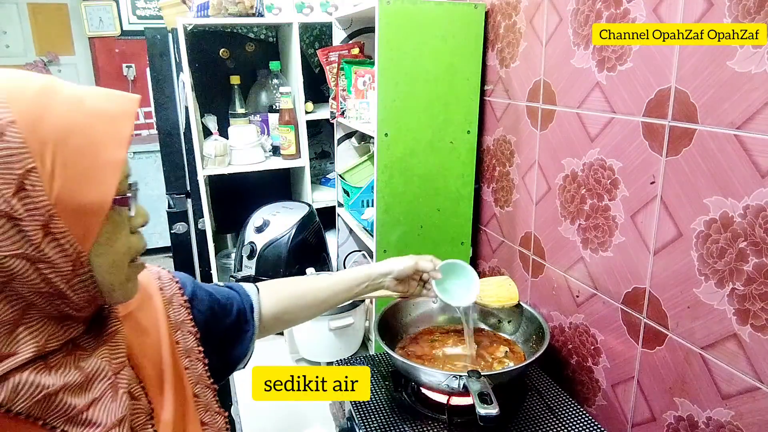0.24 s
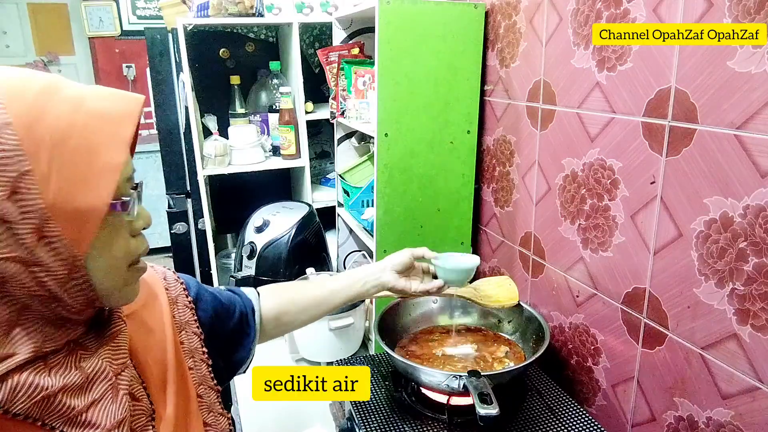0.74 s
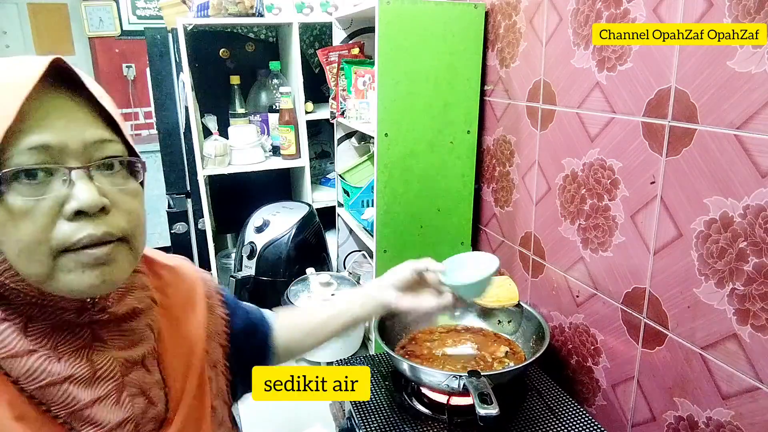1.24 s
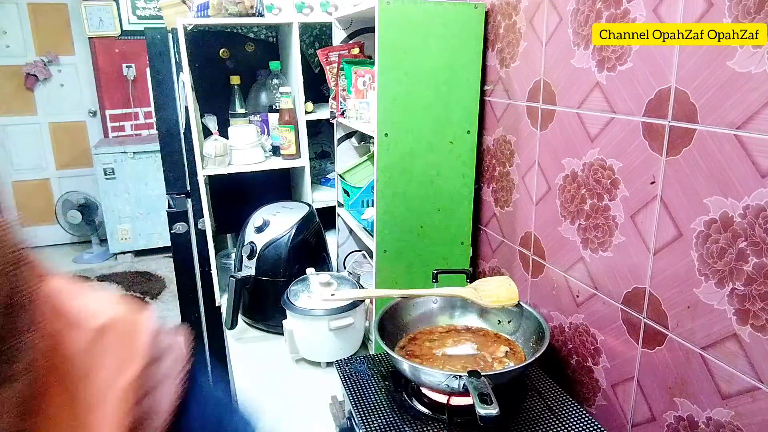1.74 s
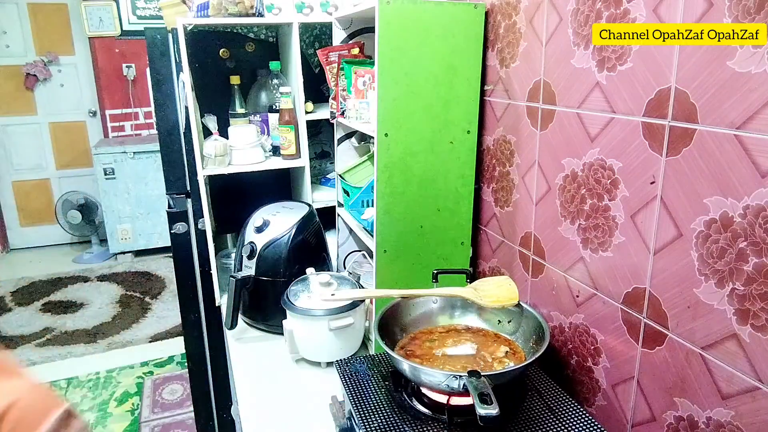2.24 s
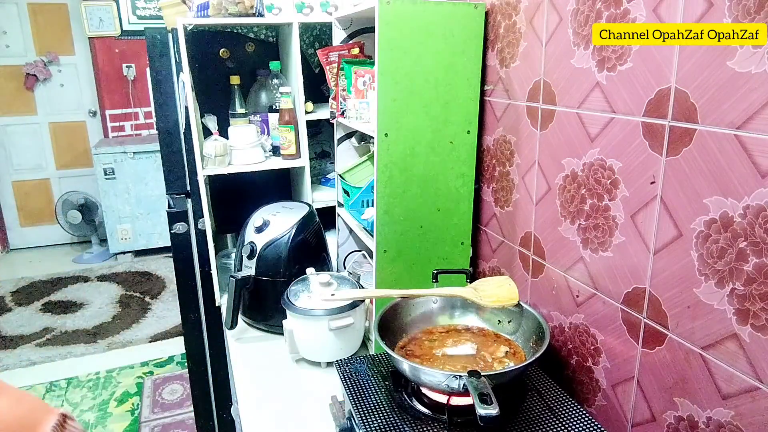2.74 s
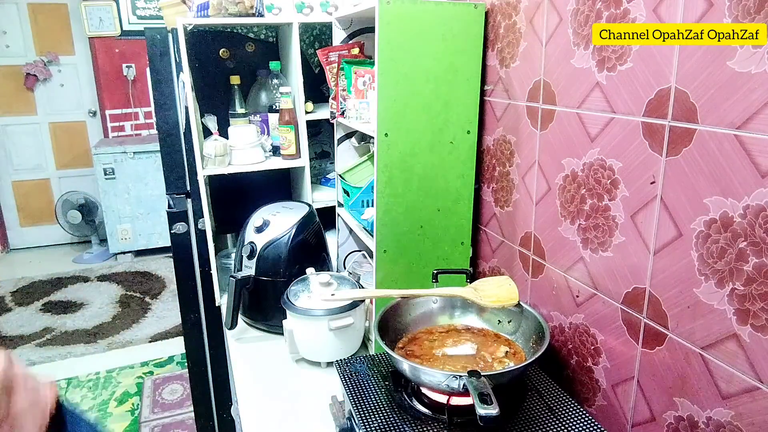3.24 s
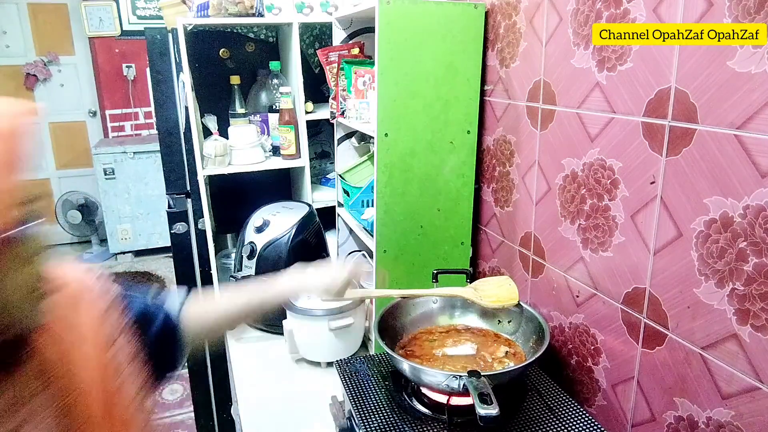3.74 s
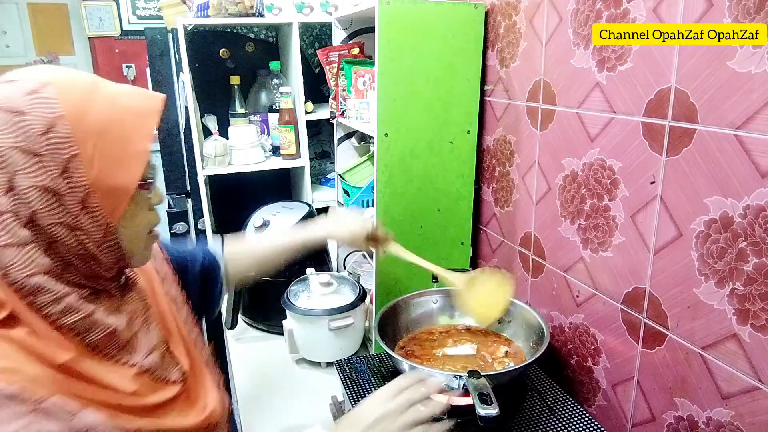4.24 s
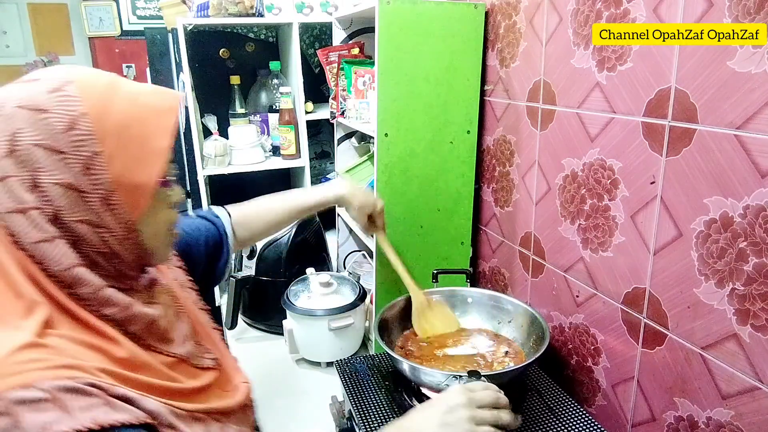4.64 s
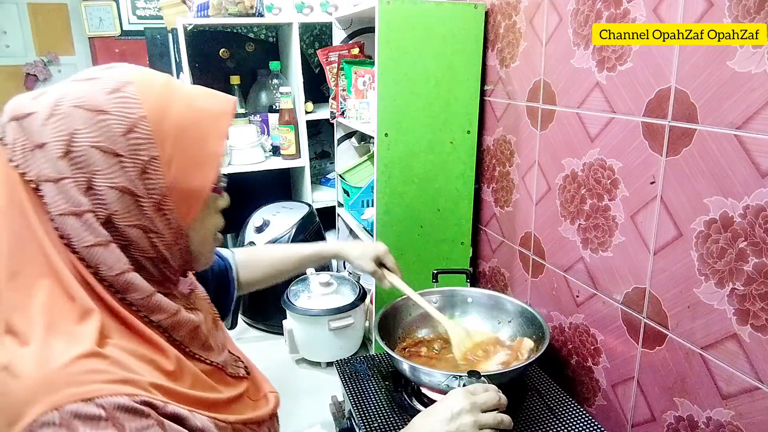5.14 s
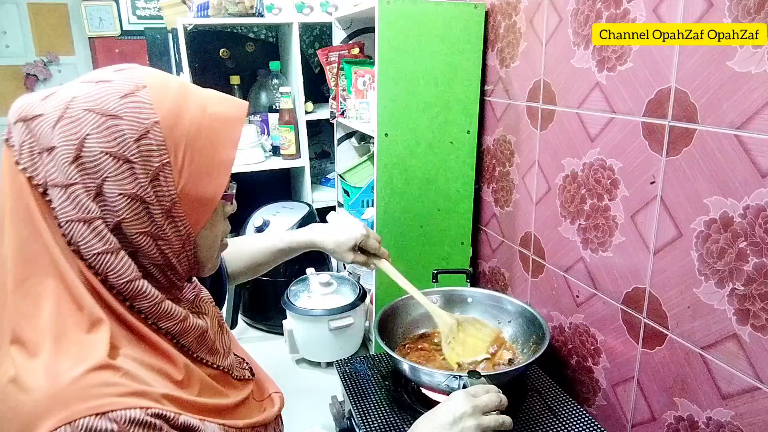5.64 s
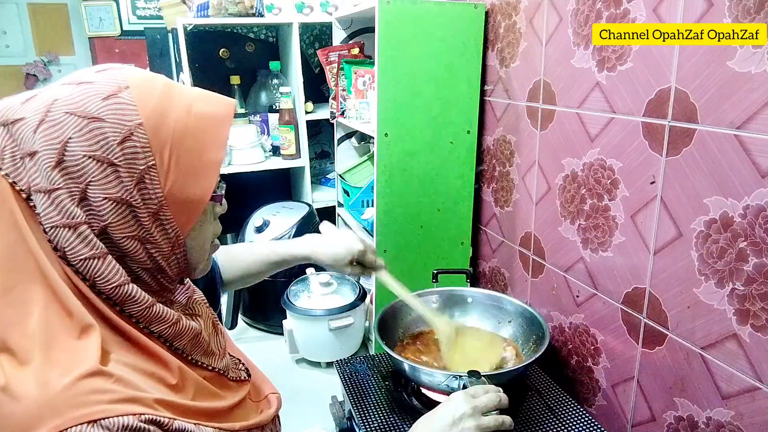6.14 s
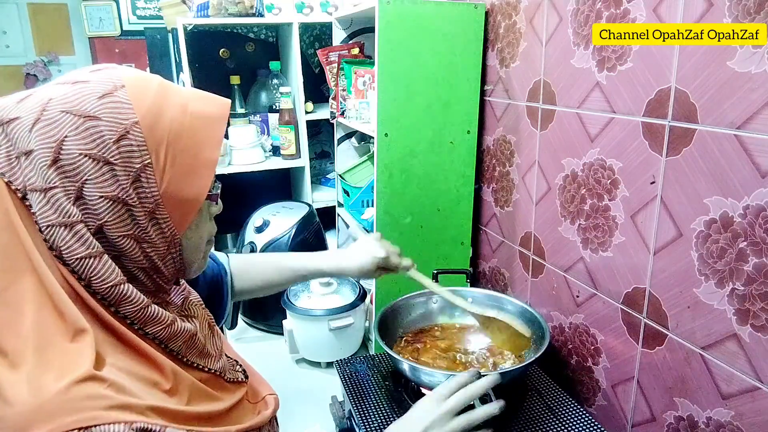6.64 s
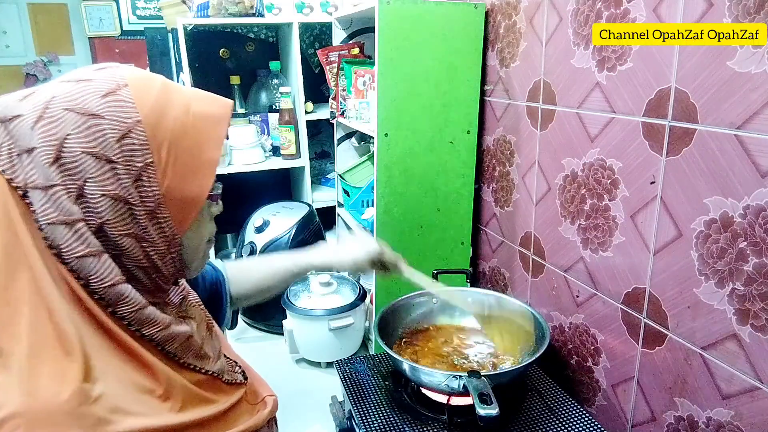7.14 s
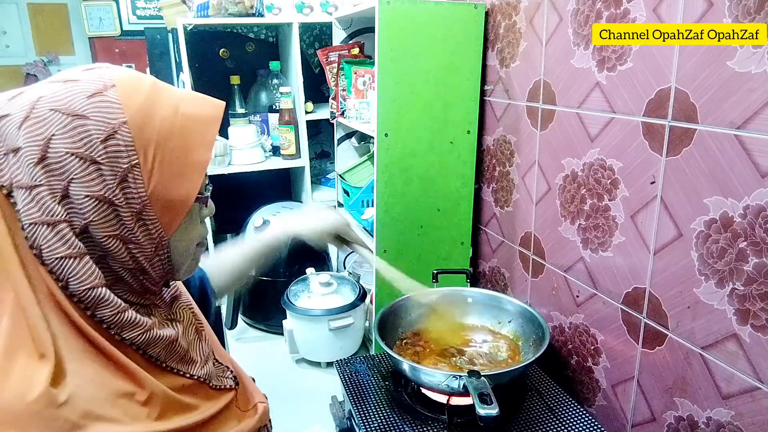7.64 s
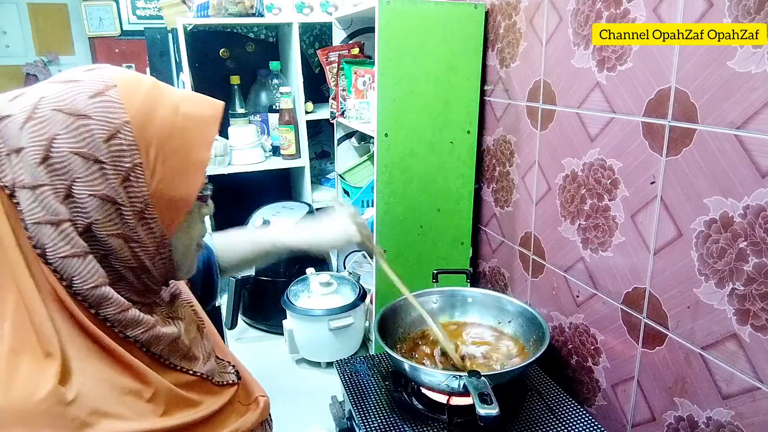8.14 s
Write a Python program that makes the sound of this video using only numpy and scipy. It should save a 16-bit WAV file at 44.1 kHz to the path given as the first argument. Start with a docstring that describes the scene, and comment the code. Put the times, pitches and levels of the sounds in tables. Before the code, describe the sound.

Gravy simmers in a steel wok on a home stove, heard close on a phone in a small tiled kitchen. From 0 to 2.8 s there is lively sizzling, round bubbling and irregular bright spits with a thin metallic ring, over faint burner hum and soft low bumps. At 2.9 s a bowl lands with a sharp rattling clack, thud and steam flare. Sparser spits follow, with a tiny dropout near 3.55 s. Around 4.5-5 s a spatula scrapes in rough, falling metallic rasps, with a sizzle swell at 4.6 s. From 5 to 6.4 s the simmer sinks to small drop fizzes and isolated ticks. At 6.6 s hot sizzle jumps up, strongest near 7.1 s with hard cracks, again at 7.7 s, with popping bubbles between. Another flare comes at 8.3 s; after 8.37 s only a dull murmur remains. Quiet hiss gates in and out throughout.

```python
"""A steel wok of gravy simmers on a home stove, a phone close by as microphone in a small tiled kitchen.
From the start noise bursts sizzle, bubble and spit through the wok's resonances over a low burner hum.
A bowl lands at 2.9 s as rattled modes; the sound drops out briefly at 3.5 s; from 4.5 s a spatula scrapes
as stick-slip rings, drops fizz and the simmer sinks. Strokes that bare hot steel swell it at 4.6 s and
from 6.6 s on; after 8.37 s a dull murmur is left. The phone's suppressor shuts quiet bands throughout."""
import sys
import numpy as np
from scipy import signal
from scipy.fft import rfft, irfft
from scipy.io import wavfile
from scipy.ndimage import uniform_filter1d

SR = 44100
rng = np.random.default_rng(int(sys.argv[2]) if len(sys.argv) > 2 else 0)


def unload_wav(signal):
    """Save mono or channel-first audio to the path in sys.argv[1] as 16-bit WAV at rate SR, clipped to [-1, 1]."""
    wavfile.write(
        sys.argv[1],
        SR,
        np.round(np.clip(np.atleast_2d(signal).T, -1, 1) * 32767).astype(np.int16),
    )


N = 370440
CLOCK_S = np.arange(0, N / SR, .001)  # slow levels are worked out once a millisecond

# spectrum of the sizzle, also used for the burner: (frequency [Hz], relative density [dB per Hz])
SIZZLE_SPECTRUM = [(590, -42.5), (1000, 0), (1320, 0.5), (1590, -1.5), (1750, -0.5), (2500, -3),
                   (2740, -10.5), (3120, -7), (5190, -10), (8260, -5.5), (10800, -12), (14900, -5.5),
                   (16000, 3.5)]


def undb(db):
    """Amplitude ratio of a level in dB."""
    return 10 ** (np.asarray(db) / 20)


def unit(x):
    """Scales a sound to an RMS of 1."""
    return x / np.sqrt(np.mean(x ** 2))


def band(x, hz, width):
    """Two-pole band-pass, gain 1 at the centre; width in Hz."""
    hz = min(hz, .42 * SR)
    return signal.lfilter(*signal.iirpeak(hz, hz / width, fs=SR), x)


def walk(rate):
    """Random levels held 1 / rate s and slewed; spread near 1."""
    k = int(SR / rate)
    held = np.repeat(rng.standard_normal(N // k + 1), k)
    return uniform_filter1d(held, k // 2)[:N]


def add(out, s, x):
    """Lays a short sound into the scene at s seconds."""
    i = int(s * SR)
    out[i:i + len(x)] += x[:N - i]


def late(x, s):
    """The same sound arriving s seconds later."""
    k = int(round(s * SR))
    return np.concatenate([np.zeros(k), x[:-k]])


def fade(t60, length_s=.5):
    """Exponential decay by 60 dB in t60 seconds."""
    return np.exp(-np.log(1000) * np.arange(int(length_s * SR)) / SR / t60)


def colour(x, spectrum, lo_hz, hi_hz):
    """Shapes a source by a spectrum between two soft edges."""
    hz, db = np.transpose(spectrum)
    f = np.arange(1, N // 2 + 2) * SR / N
    edges = 1 / np.sqrt((1 + (lo_hz / f) ** 10) * (1 + (f / hi_hz) ** 10))
    shape = undb(np.interp(np.log(f), np.log(hz), db)) * edges
    return irfft(rfft(x) * shape, N)


def swell(s, hold_s, rise_db_s, fall_db_s):
    """Power of a rise, a hold and a fall, straight in dB, 1 at the top."""
    t = CLOCK_S - s
    down_db = rise_db_s * np.maximum(-t, 0) + fall_db_s * np.maximum(t - hold_s, 0)
    return undb(-2 * down_db)


def gain(power):
    """Turns power on the millisecond clock into amplitude at every sample."""
    return np.interp(np.arange(N) / SR, CLOCK_S, np.sqrt(power))


def wok(x, ring_db):
    """The thin steel rings along with whatever happens in it."""
    # resonances of the steel: (frequency [Hz], width [Hz], level before ring_db [dB])
    steel_modes = [(498.7, 24, -5.5), (724, 31, -10), (1071, 140, -6.5), (1491, 80, -1), (1620, 55, 0),
                   (1840, 36, -4.5), (2047, 38, -0.5), (2521, 66, -2), (3104, 80, -11.5), (3836, 210, -8),
                   (4614, 29, -6), (5680, 60, -26), (6910, 530, -19), (8220, 940, -17.5),
                   (9300, 340, -12.5), (9850, 150, -29.5), (10200, 34, -18.5), (11350, 210, -24.5),
                   (12200, 240, -23.5), (14800, 530, -15.5)]
    ring = sum(undb(db) * band(x, f, w) for f, w, db in steel_modes)
    return x + undb(ring_db) * ring


def crackle(rate, scatter_db, tail_s):
    """Random bursts at rate per second, few of them large, each dying in a short noisy tail."""
    over_db = np.minimum(scatter_db * rng.exponential(size=N), 9)
    sizes = (rng.random(N) < rate / SR) * undb(over_db)
    tails = signal.lfilter([1], [1, -np.exp(-1 / (tail_s * SR))], sizes)
    return unit(tails * rng.standard_normal(N))


def pops(rate, scatter_db, tail_s):
    """Fat pops of many sizes; each sounds only in its own band."""
    centres_hz = 1500 * 2 ** np.arange(0, 3.5, .4)
    return unit(sum(band(crackle(rate, scatter_db, tail_s), hz, 0.35 * hz) for hz in centres_hz))


def patchy_hiss(spread_db, rate):
    """Hiss whose narrow bands come and go on their own."""
    out = np.zeros(N)
    for hz in 900 * 2 ** np.arange(0, 4.3, .2):
        narrow = unit(band(rng.standard_normal(N), hz, .15 * hz))
        out += np.sqrt(hz) * undb(spread_db * walk(rate)) * narrow
    return unit(out)


def pan_levels():
    """The simmer, with every stroke and flare added to it in power; large bubbles come singly."""
    # the simmer: (time [s], sizzle [dB], body of the sizzle [dB], small bubbles [dB], large bubbles [dB])
    simmer = [(0.0, -45.5, -49.5, -47, -56), (0.199, -46.5, -49.5, -47.5, -49.5),
              (0.534, -46, -50.5, -48.5, -56.5), (0.555, -44, -48, -44, -50.5),
              (1.101, -40.5, -46, -48.5, -56.5), (1.24, -45, -49, -49, -59), (1.26, -39, -48, -44, -55),
              (1.7, -45, -49.5, -47.5, -56.5), (2.17, -47, -51.5, -47.5, -57.5),
              (2.5, -44, -50.5, -48.5, -58.5), (2.85, -49.5, -51, -48.5, -71),
              (3.099, -48.5, -49, -46.5, -56.5), (3.359, -45.5, -51.5, -47.5, -57.5),
              (3.819, -47, -59.5, -48.5, -58.5), (3.97, -48.5, -55.5, -49.5, -61),
              (4.45, -52.5, -48.5, -48, -55.5), (5.05, -57, -53.5, -46.5, -58), (5.3, -55.5, -72, -50, -67),
              (5.5, -56.5, -63, -51, -66), (5.599, -62, -54.5, -48, -78), (5.78, -87, -78.5, -67.5, -78),
              (6.15, -84, -78, -56.5, -60.5), (6.42, -80.5, -55.5, -53.5, -61),
              (6.56, -34.5, -36.5, -48.5, -64.5), (6.9, -53, -46.5, -48.5, -64.5),
              (7.3, -42.5, -44, -53.5, -64), (7.459, -41, -53.5, -61, -71), (7.52, -51, -44, -51.5, -69),
              (8.0, -47, -54, -52.5, -80), (8.4, -38.5, -38.5, -45.5, -77)]
    # strokes that bare hot steel: (time [s], hold [s], sizzle [dB], body [dB], small bubbles [dB],
    # rise [dB/s], fall [dB/s])
    strokes = [(4.637, 0.11, -31, -38, -70, 163.5, 83.5), (6.609, 0.086, -31, -46, -50, 169, 35.5),
               (7.13, 0.063, -25, -34, -43, 87, 111.5), (7.695, 0.02, -28, -37, -45, 84.5, 51)]
    # sudden flares of steam: (time [s], sizzle [dB], body [dB], small bubbles [dB])
    flares = [(1.083, -36.5, -53, -54), (1.866, -33.5, -37.5, -38.5), (2.463, -46, -44, -42),
              (2.902, -29, -32, -34.5), (3.109, -47, -44.5, -65), (3.467, -45, -39.5, -50.5),
              (4.118, -45.5, -44, -60), (4.21, -50, -56, -58), (4.278, -40.5, -42, -66),
              (4.45, -37.5, -52, -56), (5.649, -43.5, -61.5, -63), (5.818, -49, -56.5, -68),
              (5.855, -49, -51, -75.5), (5.986, -78, -46, -37.5), (6.189, -42.5, -74, -85),
              (8.299, -30, -37, -49)]
    # single large bubbles: (time [s], level [dB])
    glugs = [(0.0, -49), (0.17, -46), (0.56, -60), (0.79, -50.5), (1.26, -54), (1.85, -59.5), (2.53, -54.5),
             (2.66, -52.5), (2.92, -43), (3.04, -55), (4.21, -57), (4.33, -49), (4.49, -51), (4.65, -60),
             (4.77, -54), (5.8, -59), (5.99, -49), (6.359, -57), (6.62, -65.5), (6.83, -73.5), (6.95, -56),
             (7.159, -55.5), (7.7, -61), (7.979, -55), (8.09, -59.5), (8.378, -52.5)]
    s, *columns = np.transpose(simmer)
    power = np.array([undb(2 * np.interp(CLOCK_S, s, db)) for db in columns])
    for s, hold_s, *db, rise, fall in strokes:
        power[:3] += undb(db)[:, None] ** 2 * swell(s, hold_s, rise, fall)
    for s, *db in flares:
        power[:3] += undb(db)[:, None] ** 2 * swell(s, 0, rise_db_s=2493.5, fall_db_s=265.5)
    for s, db in glugs:
        power[-1] += undb(db) ** 2 * swell(s, 0, rise_db_s=496, fall_db_s=85)
    return np.array([gain(p) for p in power])


def pan():
    """Tiny steam bursts over hiss; slower, rounder bubbles below."""
    # spectrum of the bubbles: (frequency [Hz], relative density [dB per Hz])
    bubble_spectrum = [(120, -32.5), (200, 4), (241, -11.5), (284, 2), (406, -8.5), (490, 0), (1060, -10.5),
                       (1310, -11.5), (1400, -1.5), (1820, -33.5), (3080, -120)]
    seam_hz = 3000  # body of the sizzle below, treble above
    levels = pan_levels()
    heat_db = np.clip(20 * np.log10(levels[0]) + 35.0, -15, 5)
    drowned_db = 0.444 * heat_db  # loud sizzle drowns the ring of the steel

    # the louder the sizzle, the smaller the share of crackle in it
    shares = [undb(-0.28 * heat_db) * undb(1.0), undb(0.6), undb(-4.5)]
    parts = [crackle(300, 4.2, 0.00026), pops(40, 3.7, 0.013), patchy_hiss(spread_db=2.5, rate=9)]
    fizz = sum(g * x for g, x in zip(shares, parts)) / np.sqrt(sum(g ** 2 for g in shares))
    treble = unit(wok(colour(fizz, SIZZLE_SPECTRUM, seam_hz, 22000), 8.0 - drowned_db))
    body = unit(wok(colour(fizz, SIZZLE_SPECTRUM, 1060, seam_hz), 2.0 - drowned_db))

    blubs = crackle(200, 0.99, 0.009) + undb(3.5) * rng.standard_normal(N)
    small = unit(wok(colour(blubs, bubble_spectrum, 693, 1250), 15) * undb(1.6 * walk(30)))
    large = unit(colour(blubs, bubble_spectrum, 355, 355)) * undb(2.0 * walk(11))
    return np.sum(levels * [treble, body, small, large], axis=0)


def rumble():
    """Burner and worktop hum in three loose low bands, swelling with each bump."""
    # low bumps carried by floor and worktop: (time [s], hold [s], level [dB])
    low_bumps = [(0.08, 0.026, -45.5), (0.264, 0.042, -54), (0.492, 0.015, -62.5), (0.74, 0.082, -52),
                 (1.128, 0.039, -47.5), (1.498, 0.14, -57), (1.887, 0.014, -60.5), (2.31, .01, -57),
                 (2.51, 0.036, -48.5), (2.932, 0.0087, -45), (3.052, 0.14, -53), (3.556, 0.0077, -57.5),
                 (4.51, 0.023, -47.5), (4.7, 0.2, -51.5), (6.014, 0.043, -60), (6.747, 0.04, -52.5),
                 (7.705, 0.029, -60)]
    floor_db = -71
    hum = np.zeros(N)
    for hz, width, db in [(74, 20, -5.0), (123.2, 22, 4.5), (188.0, 18, 8)]:
        hum += undb(db) * band(rng.standard_normal(N), hz, width)
    hum = band(hum, 175, 120) * undb(2.0 * walk(13))
    bumps = sum(undb(db) ** 2 * swell(s, hold_s, rise_db_s=391, fall_db_s=102.5)
                for s, hold_s, db in low_bumps)
    return gain(undb(floor_db) ** 2 + bumps) * unit(hum)


def burner_hiss():
    """The burner: steady noise, coloured like the sizzle."""
    return undb(-57.5) * unit(colour(rng.standard_normal(N), SIZZLE_SPECTRUM, 300, 20000))


def still_air():
    """The still air of the kitchen: one broad, very faint low band of noise."""
    return undb(-74.5) * unit(band(rng.standard_normal(N), 98, 230))


def spits():
    """A click, then a burst of steam, bright around one pitch, with a lower body."""
    # spits and taps: (time [s], level before the final trim [dB], brightest frequency [Hz],
    # relative level of the body [dB], decay t60 [s])
    spit_events = [(0.0, -41, 3700, -5.5, 0.098), (0.124, -24, 3700, -21.5, 0.06),
                   (0.171, -23.5, 3910, -24, 0.042), (0.217, -31.5, 3500, -12.5, 0.066),
                   (0.2612, -27, 3180, -24, 0.05), (0.2821, -23, 3800, -9, 0.027),
                   (0.4796, -26.5, 7600, -19, 0.14), (0.5477, -19.5, 7540, -9, 0.091),
                   (0.5601, -23.5, 3900, 0, 0.014), (0.596, -15.5, 3860, -34.5, 0.036),
                   (0.6747, -26, 4030, -3.5, 0.1), (0.851, -24, 14240, -12, 0.035),
                   (0.924, -28.5, 9740, -31.5, 0.11), (0.9747, -27, 8050, -22, 0.13),
                   (1.056, -12, 7190, -19, 0.045), (1.2355, -20, 4520, -14, 0.078),
                   (1.2532, -15, 8200, -35, 0.064), (1.272, -17, 8400, -10, 0.08),
                   (1.3201, -20, 7800, -11, 0.15), (1.394, -20, 8240, -56, 0.031),
                   (1.422, -26.5, 7100, -14, 0.037), (1.4523, -19, 15100, -9.5, 0.042),
                   (1.4911, -24.5, 8300, -17, 0.12), (1.646, -23, 8200, -17, 0.05),
                   (1.681, -24, 8800, -25, 0.11), (1.724, -26, 9500, -7, 0.16),
                   (1.7649, -27.5, 8800, -3, 0.039), (1.8419, -22, 3900, -21, 0.1),
                   (1.8675, -16, 8100, -10, 0.049), (2.0022, -24.5, 14100, -14.5, 0.056),
                   (2.035, -26.5, 14800, -12, 0.26), (2.0826, -16, 9530, -22, 0.022),
                   (2.1345, -25, 9000, -11, 0.14), (2.1781, -26, 6800, -5.5, 0.15),
                   (2.2987, -26, 7020, -10.5, 0.19), (2.383, -26.5, 15040, -47, 0.052),
                   (2.439, -30, 9200, -21, 0.074), (2.5364, -16, 9060, -23.5, 0.025),
                   (2.617, -19, 5720, -29.5, 0.098), (2.699, -12.5, 8460, -38.5, 0.057),
                   (2.7576, -19.5, 8040, -27.5, 0.075), (2.7779, -16, 14800, -19, 0.096),
                   (2.8252, -18, 8180, -18, 0.13), (2.8574, -25.5, 8630, -3.5, 0.033),
                   (2.9023, -7, 13630, -37.5, 0.093), (3.026, -21.5, 8530, -4, 0.037),
                   (3.0609, -21.5, 7940, -7, 0.049), (3.1001, -12.5, 6530, -18, 0.1),
                   (3.4618, -27, 9500, -4.5, 0.14), (3.5601, -33, 14800, 1, 0.14),
                   (3.6026, -20.5, 14800, -12.5, 0.077), (3.703, -30, 9500, -5.5, 0.089),
                   (3.7551, -25, 14800, -10.5, 0.038), (3.8125, -31.5, 2750, 0, 0.072),
                   (3.929, -28.5, 8030, -3.5, 0.068), (3.9587, -23.5, 12500, -32, 0.046),
                   (4.1184, -16, 7540, -14.5, 0.058), (4.1907, -17.5, 3600, -18, 0.074),
                   (4.233, -28, 3680, 0, 0.04), (4.2654, -17.5, 8200, -6.5, 0.032),
                   (4.317, -26.5, 8700, -32, 0.042), (4.386, -33, 14100, -11, 0.051),
                   (4.4419, -11.5, 5300, -10, 0.042), (4.477, -12.5, 3100, -11.5, 0.077),
                   (4.5252, -22.5, 3940, -8, 0.15), (4.595, -27, 3930, 0, 0.1),
                   (4.6103, -22, 4050, -28, 0.071), (4.7299, -11, 3170, -6, 0.044),
                   (5.074, -34, 14460, -5.5, 0.041), (5.5786, -31.5, 7920, -10, 0.052),
                   (5.6481, -30.5, 7940, 1, 0.074), (5.8155, -22, 3200, -17, 0.024),
                   (5.8559, -21, 8470, -19, 0.026), (5.9873, -43.5, 2810, -7.5, 0.086),
                   (6.1874, -18, 4400, -20, 0.025), (6.189, -24.5, 11400, -36, 0.096),
                   (6.1945, -23, 4490, -27, 0.062), (6.279, -27, 9020, -34, 0.04),
                   (6.355, -36, 3200, -1.5, 0.12), (6.4732, -23, 8850, -8, 0.066),
                   (6.5156, -24.5, 3070, -18, 0.19), (6.542, -19, 11200, -25, 0.046),
                   (6.595, -18, 8300, -34, 0.12), (6.7013, -20, 8000, -5.5, 0.06),
                   (6.7373, -28, 8460, -1, 0.1), (6.808, -21, 3130, -6.5, 0.073),
                   (6.9079, -22.5, 3160, -7.5, 0.53), (6.9621, -13.5, 8050, -9, 0.026),
                   (7.01, -29.5, 8400, 6.5, 0.18), (7.36, -25.5, 8750, -15, 0.1),
                   (7.403, -21.5, 7600, -12, 0.083), (7.439, -21.5, 14800, -45, 0.049),
                   (7.6104, -18, 8300, -15, 0.067), (7.676, -17.5, 8300, -8.5, 0.13),
                   (7.857, -24, 7700, -12.5, 0.1), (7.9897, -16, 8050, -12, 0.044),
                   (8.1611, -29.5, 8150, -15, 0.055), (8.229, -23, 9000, -26, 0.092),
                   (8.2771, -16, 7900, -9.5, 0.023), (8.2897, -13.5, 7150, -22.5, 0.14)]
    wall_echo_s, wall_echo_db = .00044, -2.5  # a spit comes back off the near wall of the wok
    out = np.zeros(N)
    for s, db, hz, body_db, t60 in spit_events:
        shape = fade(t60, length_s=.3) + undb(7.5) * fade(0.0017, length_s=.3)
        burst = rng.standard_normal((2, len(shape))) * shape
        bright = band(band(burst[0], hz, 0.22 * hz), hz, 0.96 * hz)
        bright = bright + undb(-18.5) * np.diff(burst[0], prepend=0)
        # the echo is moved to whole cycles, so it arrives in step with the brightest pitch
        cycles = max(round(wall_echo_s * hz), 1)
        bright = bright + undb(wall_echo_db) * late(bright, cycles / hz)
        body = undb(body_db + 8) * band(burst[1], 1300, 2100)
        add(out, s, undb(db - 3) * (bright + body))
    return undb(-12.5) * wok(out, 14.0)


def bursts():
    """Bubbles burst at the surface: short noise around one pitch, coloured by the steel."""
    # bursting bubbles: (time [s], peak level [dB], brightest frequency [Hz])
    burst_events = [(0.124, -36.5, 1520), (0.279, -34, 705), (0.474, -33, 1490), (0.745, -28, 730),
                    (0.859, -35.5, 950), (1.11, -32, 1470), (1.129, -42, 1050), (1.349, -33, 705),
                    (1.901, -39, 1450), (2.036, -37, 2060), (2.084, -39.5, 1580), (2.115, -34, 1620),
                    (2.328, -41, 1500), (2.371, -42, 1540), (2.461, -27.5, 1640), (2.536, -33, 1990),
                    (2.617, -42.5, 2540), (2.649, -45, 728), (3.26, -41.5, 716), (3.398, -33.5, 2080),
                    (3.673, -33.5, 2050), (3.983, -42.5, 2530), (6.447, -32, 1610), (6.614, -26.5, 2450),
                    (6.659, -37, 1630), (6.934, -24.5, 1620), (7.06, -29, 1600), (7.092, -21.5, 1500),
                    (7.501, -38, 2000), (7.569, -26.5, 1530), (7.632, -30, 1630), (7.66, -24.5, 1520),
                    (7.693, -28, 1680), (7.734, -20.5, 1630), (7.788, -30, 1620), (7.817, -23, 2560),
                    (7.922, -38.5, 1540), (8.101, -31, 1380), (8.158, -39, 2520)]
    out = np.zeros(N)
    for s, db, hz in burst_events:
        noise = fade(.04, length_s=.3) * rng.standard_normal(int(.3 * SR))
        burst = wok(band(noise, hz, 0.36 * hz), 3.8)
        add(out, s, undb(db) * burst / np.abs(burst).max())
    return out


def cracks():
    """Spitting fat: one steep pressure step each, with a few milliseconds of bright spray."""
    # sharp single cracks: (time [s], level before the wok rings along [dB])
    crack_events = [(0.5483, -20.5), (0.8595, -31.5), (0.944, -30), (0.9756, -23.5), (1.7776, -25.5),
                    (1.9457, -30.5), (2.0831, -27), (2.376, -26), (2.4386, -24), (2.4771, -25.5),
                    (2.5364, -27.5), (2.8241, -20), (3.1013, -26), (3.174, -31), (3.5026, -22),
                    (3.9601, -34.5), (4.1828, -26), (4.3166, -26.1), (4.7996, -19), (4.9837, -26.5),
                    (5.6513, -30.5), (5.819, -31.5), (6.473, -34), (6.518, -25), (6.5419, -18),
                    (6.5962, -18.5), (6.9088, -22), (7.125, -7), (7.1848, -11.5), (7.351, -27),
                    (7.3605, -26.5), (7.449, -27), (7.5473, -32.5), (7.8593, -20.5), (8.1924, -26.5),
                    (8.198, -30)]
    out = np.zeros(N)
    for s, db in crack_events:
        noise = rng.standard_normal(int(.03 * SR))
        spray = undb(-14) * fade(0.018, length_s=.03) * np.diff(noise, prepend=0)
        spray[:4] = [1, .2, -.8, -.4]  # sums to nothing, so the step has little bass
        add(out, s, undb(db) * spray)
    return wok(out, -1.5)


def bowl():
    """The bowl lands; a short rattling contact shakes its modes."""
    # the landing: (time [s], level before the ring and rattle shares [dB])
    landing = [(2.899, -11.5)]
    # modes of the bowl: (frequency [Hz], relative level [dB], t60 that sets the mode width [s])
    bowl_modes = [(1200, 7, 0.44), (1610, 7.5, 0.16), (4300, 4, 0.22), (6570, 8.5, 0.088), (7540, 1, 0.11),
                  (7600, -2, 0.29), (8300, -8, 0.24), (9500, -2.5, 0.13), (10840, -10, 0.14),
                  (12000, -2, 0.16), (13100, 0, 0.11)]
    out = np.zeros(N)
    (s, db), = landing
    t = np.arange(int(.5 * SR)) / SR
    attack = np.minimum(t / 0.0019, 1) ** 2
    rattle = attack * fade(0.086) * rng.standard_normal(len(t))
    # a mode that dies in t60 is 2.2 / t60 wide; the hand on the bowl damps it much further
    modes = [band(rattle, f, 12 / t60) for f, _, t60 in bowl_modes]
    ring = sum(undb(g) * m / np.abs(m).max() for m, (_, g, _) in zip(modes, bowl_modes))
    add(out, s, undb(db) * (undb(-16.5) * ring + undb(-31.5) * rattle))
    return out


def knocks():
    """A rough thud, a short woody ring, and the low modes of the worktop."""
    # dull knocks of wood, hand and bowl: (time [s], thud peak [dB], thud frequency [Hz], thud t60 [s],
    # woody ring relative to the thud [dB], worktop ring [dB])
    knock_events = [(2.909, -25.5, 134, 0.089, -15.5, -38), (3.012, -47, 152, 0.082, 2, -39),
                    (4.479, -37, 305, 0.5, -7, -65), (5.981, -37, 442, 0.48, -1, -67),
                    (6.711, -54, 109, 0.24, -20, -57)]
    # modes of the worktop: (frequency [Hz], relative level [dB], t60 [s])
    worktop_modes = [(78.5, -3, .25), (120, 5, 0.43), (191, -1, 0.28)]
    out, t = np.zeros(N), np.arange(int(.5 * SR)) / SR
    worktop = sum(undb(g) * fade(t60) * np.sin(2 * np.pi * f * t) for f, g, t60 in worktop_modes)
    wood = fade(0.15) * (np.sin(2 * np.pi * 690 * t) + np.sin(2 * np.pi * 470 * t))
    for s, db, hz, t60, wood_db, worktop_db in knock_events:
        thud = band(band(fade(t60) * rng.standard_normal(len(t)), hz, 0.25 * hz), hz, 2.1 * hz)
        blow = thud / np.abs(thud).max() + undb(wood_db) * wood
        add(out, s, undb(db) * blow + undb(worktop_db) * worktop)
    return out


def drips():
    """A small drop fizzes for a moment in one narrow band."""
    # drops off the spatula: (time [s], peak level [dB], frequency [Hz])
    drop_events = [(3.8127, -30.5, 2080), (3.927, -33.5, 1730), (4.982, -43.5, 1420), (5.08, -53.5, 3050),
                   (5.15, -49, 736), (5.23, -44, 704), (5.405, -43, 698), (5.425, -51, 940),
                   (5.545, -42.5, 797), (5.185, -39.5, 1477), (5.2309, -44, 1460), (5.231, -45.5, 3840),
                   (5.277, -45.5, 8800), (5.416, -48.5, 4550), (5.484, -50, 2560), (5.44, -51, 3530),
                   (5.5385, -40.5, 1480), (5.554, -47, 1520), (5.578, -45.5, 4000), (5.653, -51, 1460),
                   (5.612, -49.5, 1550), (5.679, -49.5, 1460), (5.715, -42.5, 1470), (5.735, -52, 1480),
                   (6.188, -31.5, 4220), (6.03, -51, 2220), (6.214, -44.5, 1490), (6.27, -46, 1470),
                   (6.3, -46, 1070), (6.331, -50, 2030), (6.358, -36, 1560), (6.404, -44, 4100)]
    out = np.zeros(N)
    for s, db, hz in drop_events:
        noise = fade(0.046) * rng.standard_normal(int(.5 * SR))
        fizz = band(band(noise, hz, 0.065 * hz), hz, 0.3 * hz)
        add(out, s, undb(db) * fizz / np.abs(fizz).max())
    return out


def scrape():
    """Dense uneven stick-slip: a rough ring whose pitch mostly sinks along the stroke."""
    # the blade dragged over the steel: (time [s], ring frequency [Hz], level [dB])
    drag = [(4.537, 1759, -67), (4.581, 1733, -34), (4.664, 1751, -43), (4.761, 1689, -34.5),
            (4.828, 1490, -42), (4.931, 1468, -58.5), (5.0, 1457, -49)]
    s, hz, db = np.transpose(drag)
    t = np.arange(N) / SR
    phase = 2 * np.pi * np.cumsum(np.interp(t, s, hz)) / SR
    grip = [unit(uniform_filter1d(crackle(180, 1.4, 0.00095), int(.0017 * SR))) for _ in range(2)]
    ring = grip[0] * np.sin(phase) + grip[1] * np.cos(phase)
    return undb(np.interp(t, s, db, left=-120, right=-120)) * ring


def slips():
    """Each slip is a short blow into the damped ring of the spatula blade."""
    # slips of the spatula edge on the steel: (time [s], starting level [dB], ring frequency [Hz])
    slip_events = [(4.55, -32, 1780), (4.565, -27, 1830), (4.5938, -21, 1690), (4.6088, -22, 1740),
                   (4.6727, -27, 1860), (4.695, -28, 1840), (4.7137, -26, 1750), (4.7317, -25, 1665),
                   (4.754, -23, 1586), (4.787, -24, 1660), (4.8118, -27, 1450), (4.893, -33, 1730),
                   (4.927, -36, 1530)]
    out, t = np.zeros(N), np.arange(int(.5 * SR)) / SR
    for s, db, hz in slip_events:
        add(out, s, undb(db) * fade(0.044) * np.sin(2 * np.pi * hz * t))
    return out


def kitchen_echo(hits):
    """The tiled room answers with a decaying noise tail."""
    tail = fade(0.38) * rng.standard_normal(int(.5 * SR))
    tail[:int(.004 * SR)] = 0  # the nearest wall answers after a few milliseconds
    echo = signal.fftconvolve(hits, tail / np.sqrt(np.sum(tail ** 2)))[:N]
    return undb(-8.5) * echo


def scene():
    """Everything in the kitchen as it reaches the phone; only the single hits get the room's echo."""
    rim_echo_s, rim_echo_db = .00198, -8  # fat comes back again from the far rim of the wok
    fat = spits() + cracks()
    hits = fat + undb(rim_echo_db) * late(fat, rim_echo_s)
    hits = hits + bursts() + bowl() + knocks() + drips() + scrape() + slips()
    steady = pan() + rumble() + burner_hiss() + still_air()
    return (steady + hits + kitchen_echo(hits))[None]


def suppress(x, over_db, cling_db, memory_s, ceiling_db, floor_db, release_s, depth_db, size=512):
    """A narrow band opens at once when it rises over its recent level, clings open, then closes slowly."""
    hop = size // 4
    hz, _, spec = signal.stft(x, SR, nperseg=size, noverlap=size - hop)
    power = uniform_filter1d(np.abs(spec) ** 2, size=4, axis=1)
    db = 10 * np.log10(power + 1e-18)
    usual = np.median(db, axis=1, keepdims=True)
    forget = np.exp(-hop / (memory_s * SR))
    recent = usual + signal.lfilter([1 - forget], [1, -forget], db - usual, axis=1)
    # the ceiling keeps loud sound from being taken for noise
    rise_db = db - np.clip(recent, usual + floor_db, usual + ceiling_db)
    is_open, drop = np.ones(db.shape), hop / (release_s * SR)
    for i in range(1, db.shape[1]):
        was = is_open[:, i - 1]
        opens = rise_db[:, i] > over_db - cling_db * (was == 1)
        is_open[:, i] = np.maximum(opens, was - drop)
    depth = depth_db * np.clip(hz / 1200, .3, 1)[:, None]  # the bass is touched less
    return signal.istft(spec * undb(-depth * (1 - is_open)), nperseg=size, noverlap=size - hop)[1][:N]


def record(dry):
    """The phone loses the deep bass, suppresses steady noise and cuts the top."""
    # response between wok, tiles and phone, mostly dips: (frequency [Hz], width [Hz], gain [dB])
    response = [(1352, 81, -14.5), (2253, 77, 0), (2670, 170, 0.5), (1730, 68, -2), (3240, 240, -3),
                (5330, 1100, -2), (10500, 270, 0)]
    dropout_s, dropout_length_s = 3.547, 0.011  # the sound drops out briefly
    murmur_s, murmur_hz = 8.371, 600  # from here on only a dull murmur is left
    x = signal.sosfilt(signal.butter(5, 56, "high", fs=SR, output="sos"), dry[0])
    for hz, width, db in response:
        x = x - (1 - undb(db)) * band(x, hz, width)
    x = suppress(x, over_db=4.5, cling_db=5.0, memory_s=1.0, ceiling_db=-0.63, floor_db=-10.5,
                 release_s=0.19, depth_db=18)

    t = np.arange(N) / SR - dropout_s
    x = x * np.clip(np.maximum(-t, t - dropout_length_s) / 0.00032, .01, 1)

    cut = int(murmur_s * SR)
    murmur = signal.sosfilt(signal.butter(3, murmur_hz, fs=SR, output="sos"), x)
    x[cut:] = murmur[cut:] + .015 * x[cut:]
    return signal.sosfilt(signal.ellip(10, .2, 60, 15520, fs=SR, output="sos"), x)[None]


dry = scene()
out = record(dry)
unload_wav(out)
```